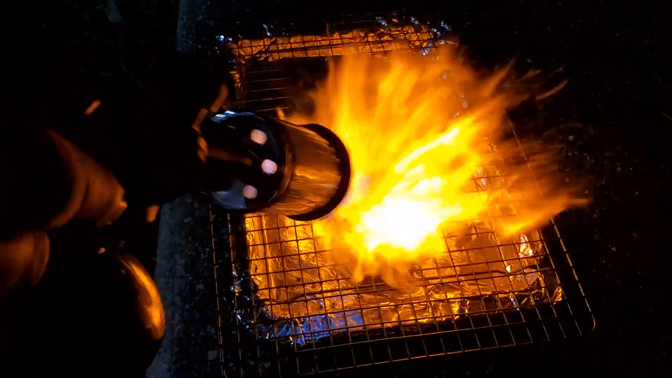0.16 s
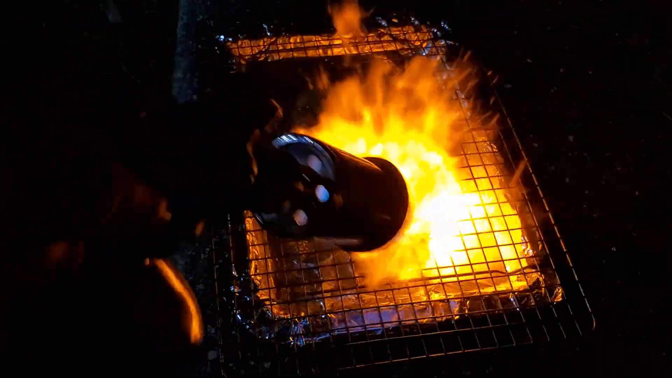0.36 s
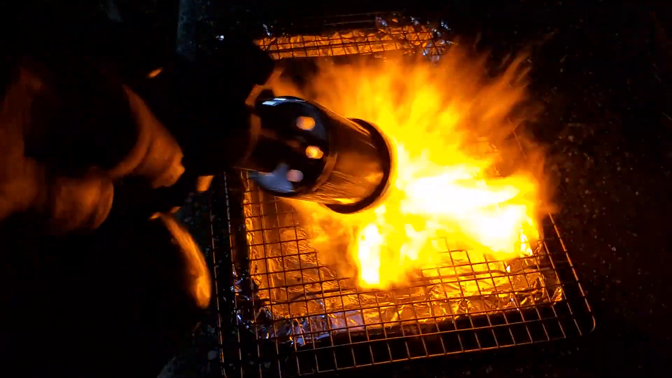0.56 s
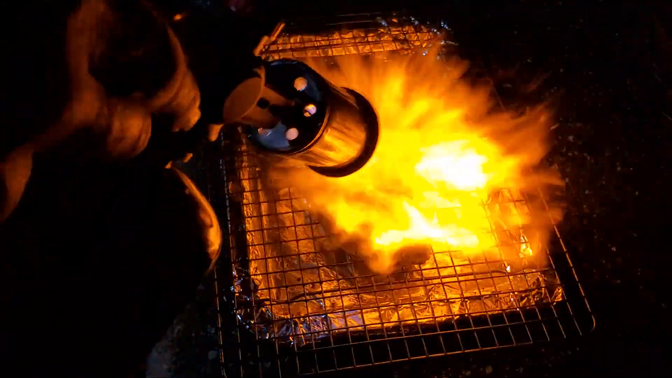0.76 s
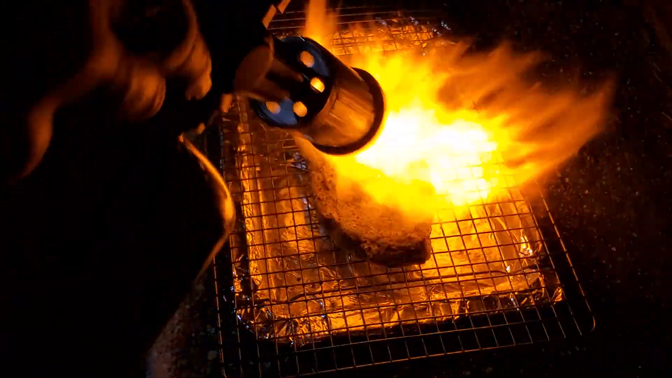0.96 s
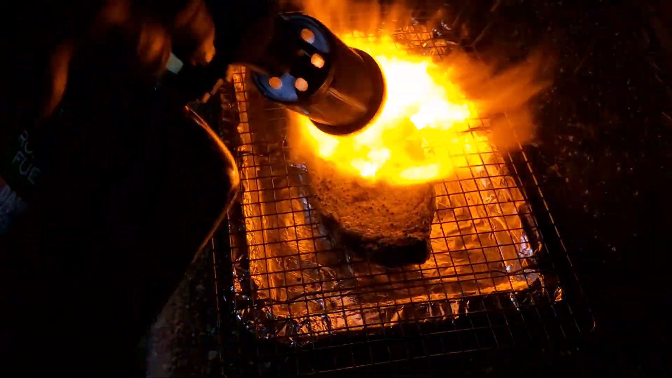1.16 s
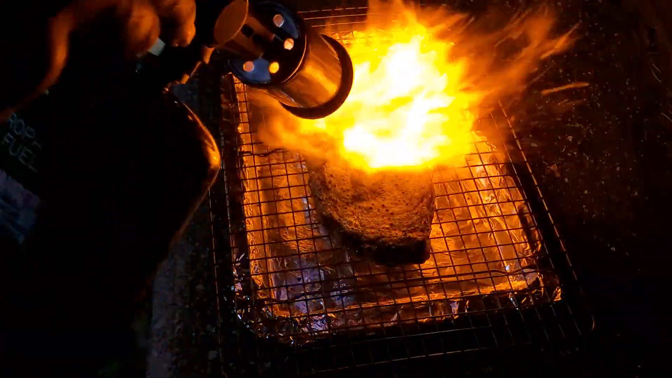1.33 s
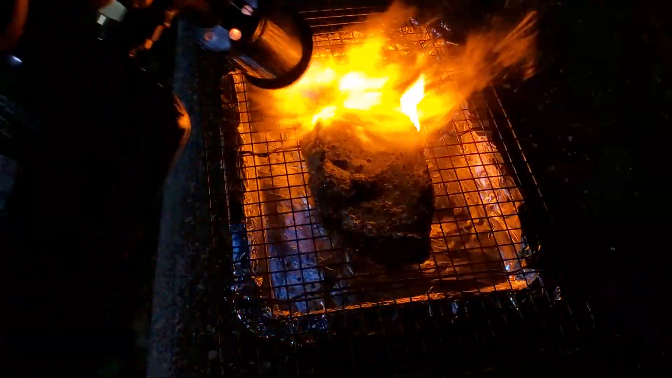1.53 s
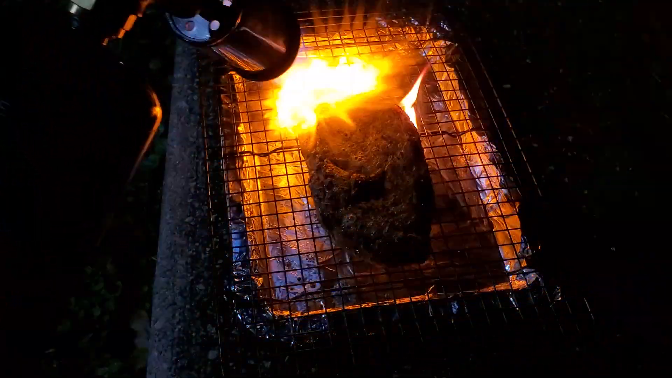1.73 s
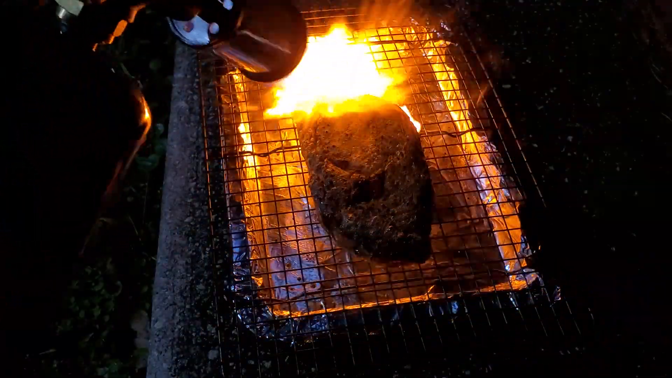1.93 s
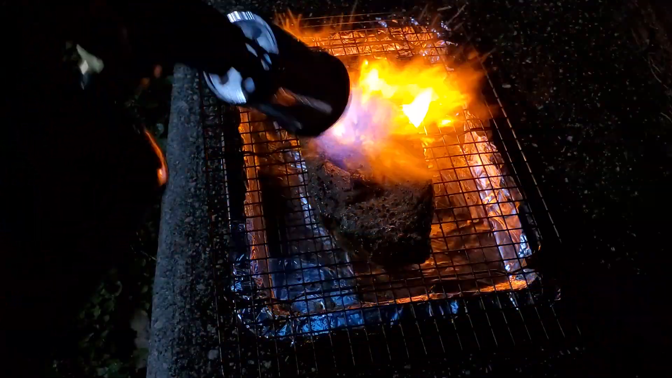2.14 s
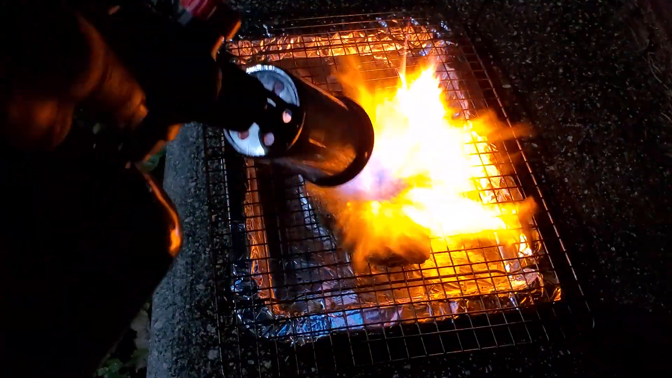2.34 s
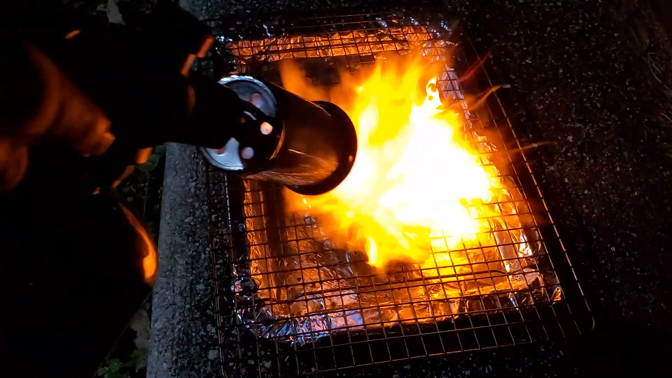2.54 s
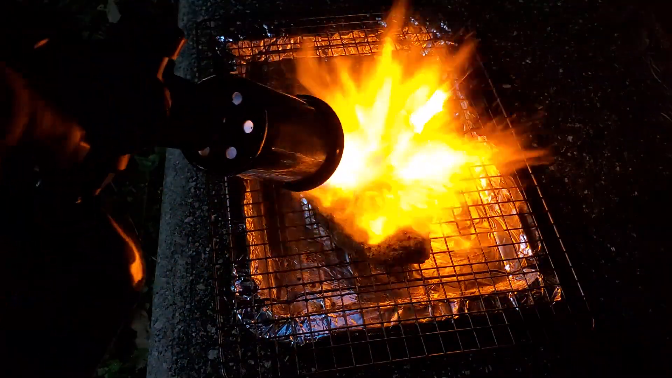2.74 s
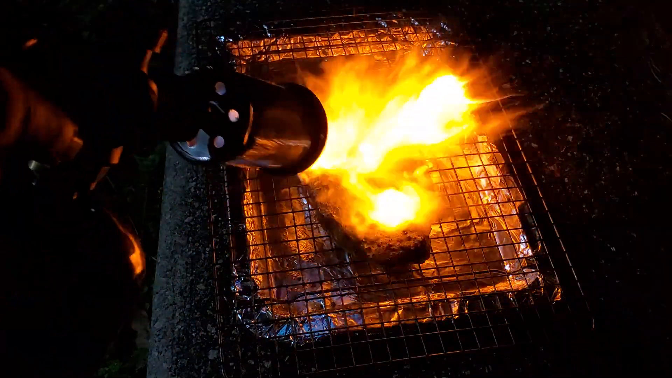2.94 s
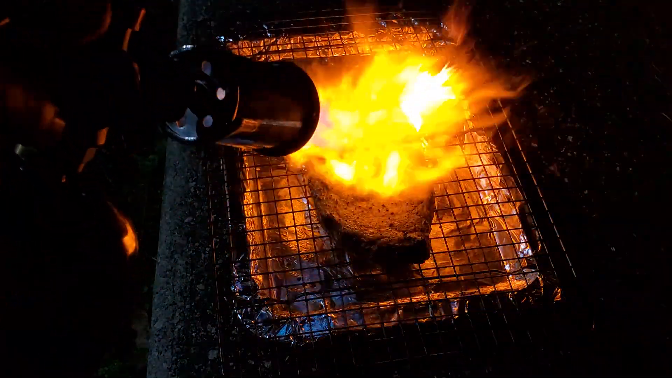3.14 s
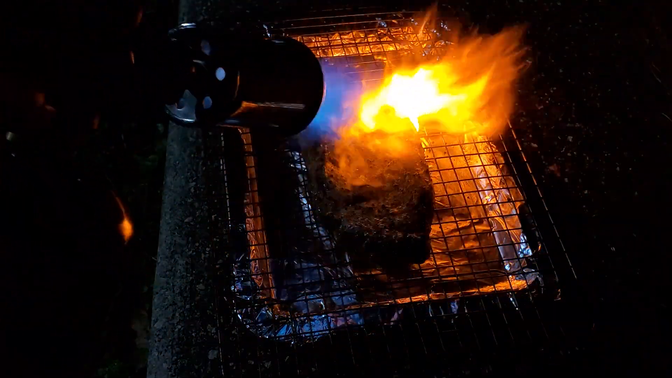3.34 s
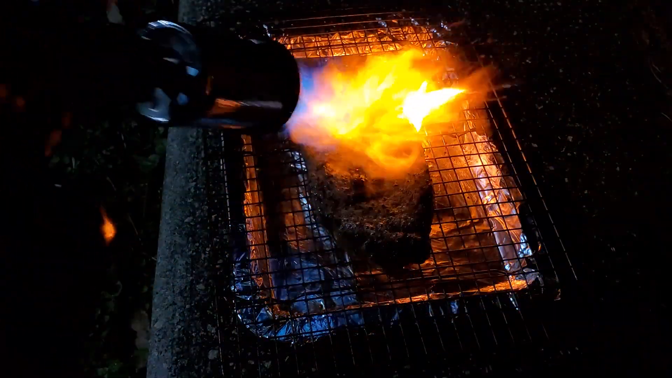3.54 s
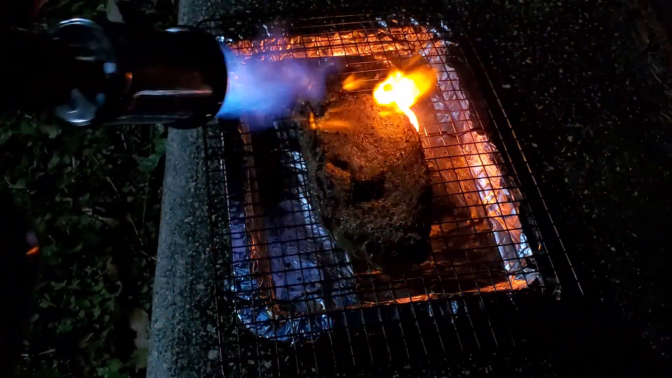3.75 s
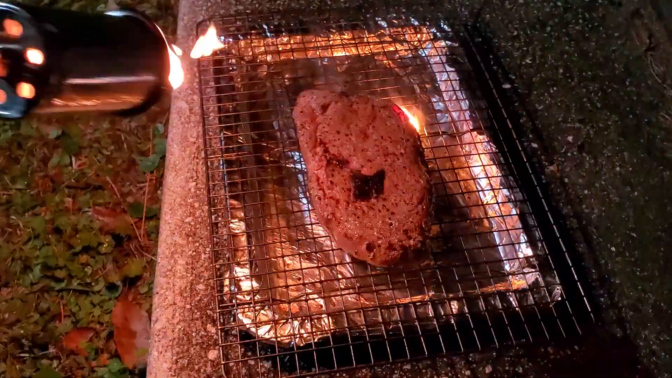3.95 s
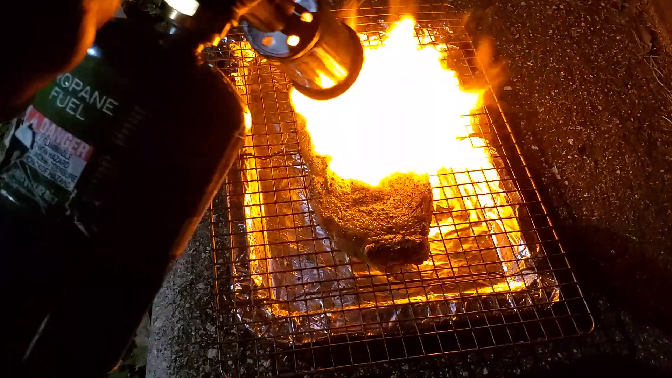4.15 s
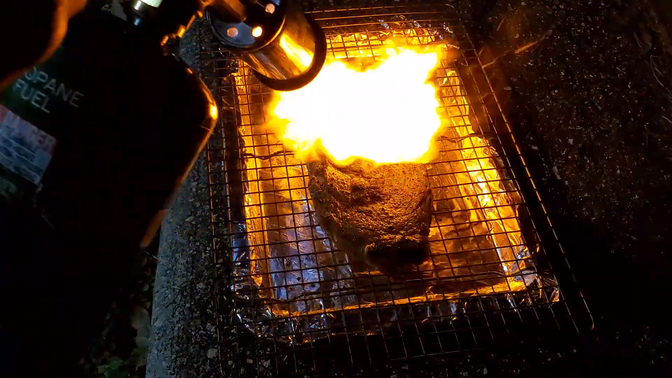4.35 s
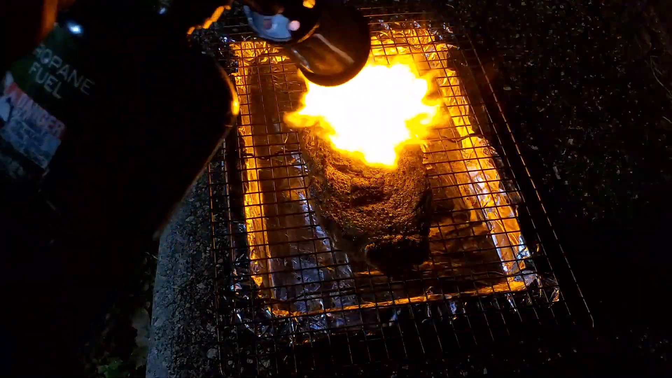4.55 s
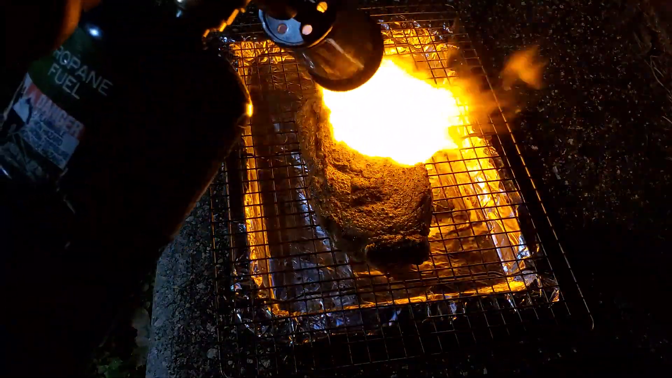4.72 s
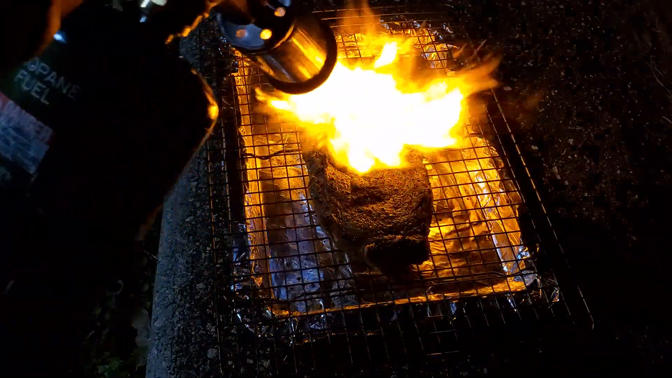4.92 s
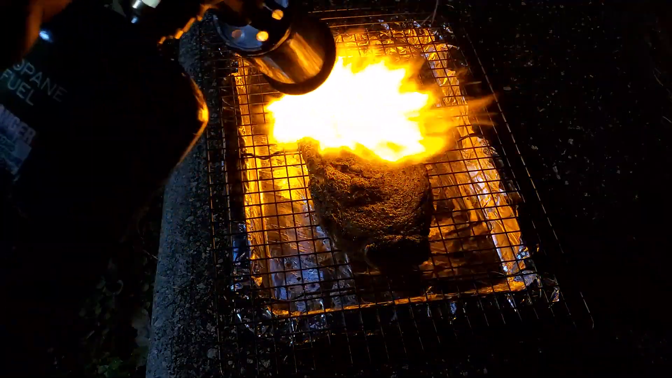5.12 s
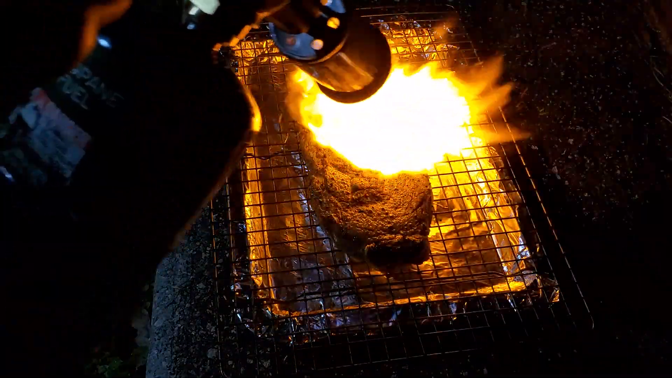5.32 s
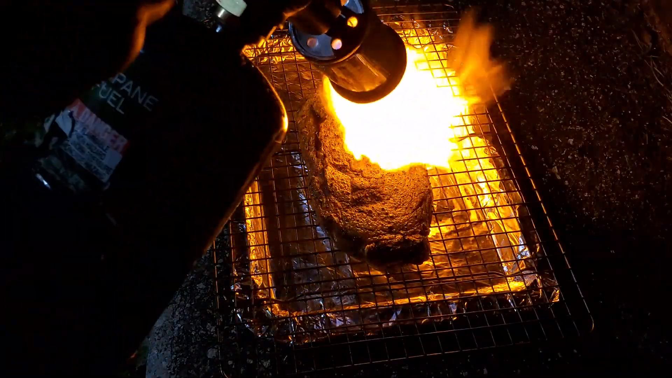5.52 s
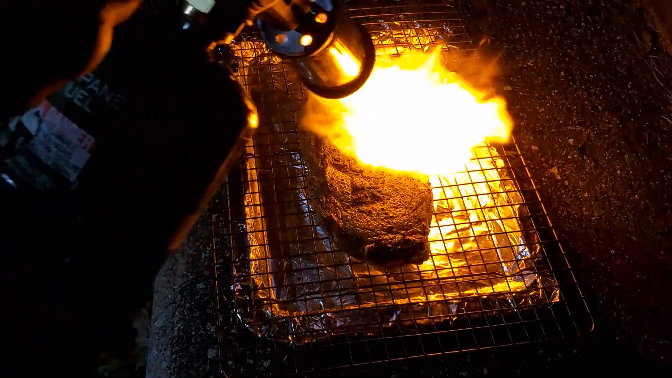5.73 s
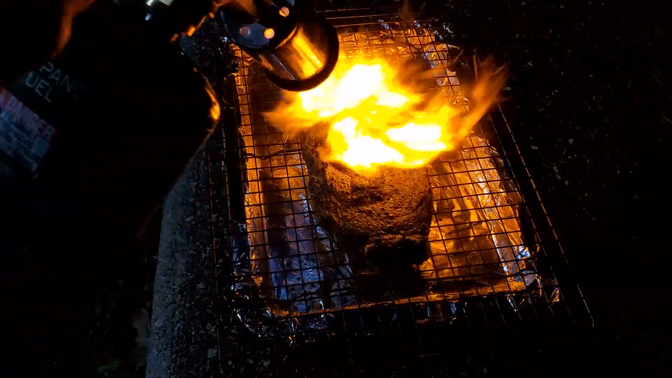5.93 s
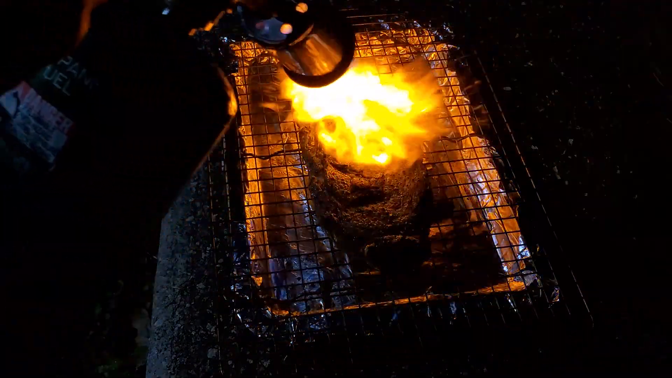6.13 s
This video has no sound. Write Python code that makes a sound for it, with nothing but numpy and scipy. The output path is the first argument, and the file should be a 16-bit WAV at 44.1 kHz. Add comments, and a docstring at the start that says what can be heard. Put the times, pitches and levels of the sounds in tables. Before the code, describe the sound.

Close to the microphone outdoors at night, a handheld gas torch roars loudly, its tone shifting as it sweeps over meat on a grill tray. Fat sizzles faintly and spits. A bright splat bursts midway, the flame fades to a few crackling spits over a low distant machine hum, then a snap and puff relight it and the roar resumes.

```python
"""Outdoors at night, close to a camera: a handheld gas torch sears meat on a grill tray, a machine hums far off.
First the turbulent flame, shaped noise, roars and rings in tube and tray, changing colour as it is aimed.
Fat sizzles throughout as noise and ticks, and spits in short noise puffs; a big spit bursts on the tray.
The torch is drawn back and the flame dies away amid a few more spits.
Then a snap and a push of air light it again, and it roars on from steeply above."""
import sys
import numpy as np
from scipy import signal
from scipy.fft import rfft, irfft, next_fast_len
from scipy.io import wavfile
from scipy.ndimage import uniform_filter1d, map_coordinates

SR = 44100
rng = np.random.default_rng(int(sys.argv[2]) if len(sys.argv) > 2 else 0)


def dump_mix(stems):
    """Bounce the given channels to the path in sys.argv[1] as a 16-bit WAV at rate SR."""
    frames = np.atleast_2d(stems).T  # one column per channel
    limited = np.clip(frames, -1, 1)  # hard clip at full scale
    pcm = np.round(limited * 32767).astype(np.int16)
    wavfile.write(sys.argv[1], SR, pcm)


N = 272538
TIME_S = np.arange(N) / SR
RELIGHT_S = 4.128


def amp(db):
    """Decibels to gain."""
    return 10 ** (np.asarray(db) / 20)


def unit(x):
    """Scale to rms 1."""
    return x / np.sqrt(np.mean(x ** 2) + 1e-20)


def along(points, hz):
    """(frequency [Hz], value) points read on a log frequency axis."""
    f, v = np.transpose(points)
    return np.interp(np.log(hz + 1), np.log(f + 1), v)


def bell(offset, width):
    """A smooth bump of height 1; width is its full width at half height."""
    return 2 ** -((2 * offset / width) ** 2)


def wobble(rate, times=TIME_S):
    """A smooth random curve with rate knots a second, read at the given times."""
    knots = rng.standard_normal(int(N * rate / SR) + 4)
    return map_coordinates(knots, [times * rate])


def filtered(x, response):
    """x times a response of frequency."""
    size = next_fast_len(N + 8192)
    spectrum = rfft(x, size) * response(np.fft.rfftfreq(size, 1 / SR))
    return irfft(spectrum, size)[..., :N]


def coloured(x, spectrum):
    """Give white sound a spectrum and keep its power."""
    return filtered(x, lambda hz: unit(amp(along(spectrum, hz))))


def puff(start_s, t60):
    """Stereo noise that starts at once and falls by 60 dB in t60 seconds."""
    start = int(start_s * SR)
    t = np.arange(SR // 20) / SR
    out = np.zeros((2, N))
    out[:, start:start + len(t)] = amp(-60 * t / t60) * rng.standard_normal((2, len(t)))
    return out


# tones of the far machine: (frequency [Hz], level [dB rms])
MACHINE_TONES = [(60, -53), (120, -51), (180, -59), (240, -75), (360, -68)]
# colour of the low outdoor air: (frequency [Hz], relative density [dB per Hz])
FAR_RUMBLE = [(20, -17), (70, -1), (150, -6), (280, -26), (500, -26), (1200, -36), (4000, -53)]


def night(rumble_db=-52, stray_db=-60):
    """A far machine hums over a low outdoor rumble, part of it unrelated between the microphones."""
    hum = np.zeros(N)
    for hz, db in MACHINE_TONES:
        cycles = hz * TIME_S + rng.random()
        hum += amp(db) * np.sqrt(2) * np.sin(2 * np.pi * cycles + .3 * wobble(2.6))
    shared_air = amp(rumble_db) * rng.standard_normal(N)
    stray_air = amp(stray_db) * rng.standard_normal((2, N))
    return hum + coloured(shared_air + stray_air, FAR_RUMBLE)


# colour of frying fat, also used for the snaps of the spits: (frequency [Hz], relative density [dB per Hz])
FAT = [(300, -28), (1000, -20), (1800, -0.5), (4200, -6.5), (7500, 0.5), (9600, -9), (12500, 1.5),
       (15500, -5)]


def sizzle(fry_db=-49, crackle_db=-55, spread_db=6.0, count=700):
    """Countless tiny bubbles of fat fry; some burst loudly enough to be heard as single ticks."""
    when, size, side = rng.random((count, 3)).T
    # mostly weak ticks and a few strong ones
    strength = amp(spread_db * np.minimum(-np.log(1 - size), 4))
    at = (when * N).astype(int)
    ticks = [np.bincount(at, strength * np.sqrt(part), N) for part in (side, 1 - side)]
    crackle = amp(crackle_db) * unit(np.array(ticks))
    frying = amp(fry_db) * rng.standard_normal((2, N))
    return coloured(crackle + frying, FAT)


# small spits of fat: (time [s], level [dB], to which snap_db or body_db is added)
SPITS = [(1.163, -18), (1.549, -18), (3.8477, -31), (3.8574, -26), (3.895, -25), (3.9973, -31),
         (4.0741, -31), (4.0865, -24)]
# the big spit that bursts on the tray: (time [s], level [dB], t60 [s])
BURST = (3.3108, -13, .017)
# colour of a splat on the tray: (frequency [Hz], relative density [dB per Hz])
SPLAT = [(500, -25), (2200, -9), (3300, 0), (5200, -7), (7200, -2), (9600, -12), (14500, -5)]


def spits(snap_hz=6500, snap_db=2.5, body_db=-13):
    """Drops of fat burst with a thin bright snap over a little body; the big one splats on the tray."""
    snaps = sum(amp(db + snap_db) * puff(s, t60=.007) for s, db in SPITS)
    bodies = sum(amp(db + body_db) * puff(s, t60=.008) for s, db in SPITS)
    # a high-pass thins the snaps
    thin = filtered(coloured(snaps, FAT), lambda hz: hz ** 2 / np.hypot(hz ** 2, snap_hz ** 2))
    burst_s, burst_db, burst_t60 = BURST
    splat = amp(burst_db) * puff(burst_s, burst_t60)
    return thin + coloured(bodies + splat, SPLAT)


def dip(depth_db=11, fall_s=0.0011, recover_s=0.023):
    """Gain for a level that dips briefly at the big spit."""
    t = TIME_S - BURST[0]
    return amp(-depth_db * np.exp(-(t / np.where(t < 0, fall_s, recover_s)) ** 2))


def ignition(push_db=-14, spark_db=-25, push_s=.0003):
    """The spark ticks and the gas catches with one short push of air."""
    u = np.maximum(TIME_S - RELIGHT_S, 0) / push_s
    push = (u > 0) * (u - 1) * np.exp(-u)
    return amp(push_db) * push + amp(spark_db) * puff(RELIGHT_S, t60=.004)


def resonances(modes, hz, frames, drift=0.018, waver=0.31, flicker_rate=28):
    """Lift in dB, frequency by time; each mode drifts in pitch, and the higher ones flicker more in strength."""
    lift_db = 0
    for centre, width, db in modes:
        strength = 1 + waver * np.sqrt(centre / 5000) * wobble(flicker_rate, frames)
        drifting_hz = centre * (1 + drift * wobble(7, frames))
        lift_db = lift_db + db * strength * bell(hz[:, None] - drifting_hz, width)
    return lift_db


# the jet sweeps over the meat and one resonance swells, or sinks if negative:
# (time [s], length [s], frequency [Hz], peak lift [dB])
SWELLS = [(.35, .2, 3550, 7), (.85, 0.18, 3240, 6.5), (1.13, 0.47, 2840, 8.5), (1.617, 0.54, 1610, 4),
          (1.8, 0.36, 3200, -11), (2.35, 0.33, 2700, 7), (2.75, .55, 1590, -8), (2.85, 0.61, 3600, 6.5),
          (4.3, .2, 3400, 5), (5, 0.2, 3400, 3.5), (5.6, .6, 2940, 6.5)]


def sweep(hz, frames, width_hz=310):
    """Lift in dB as the jet moves over the meat and resonances swell in turn."""
    return sum(db * np.outer(bell(hz - centre, width_hz), bell(frames - s, length))
               for s, length, centre, db in SWELLS)


def tray_echo(hz, frames, pose, delay_s=0.001295, per_pose_s=0.00031, shake_s=.00004, ripple_db=0.56):
    """The tray's echo cuts a comb into the hiss, which slides as the hand moves."""
    shake = np.interp(frames, TIME_S, wobble(2.81))
    delay = delay_s + per_pose_s * pose + shake_s * shake
    treble = np.clip((hz - 1500) / 1000, 0, 1)[:, None]
    return ripple_db * treble * np.cos(2 * np.pi * np.outer(hz, delay))


# likeness of the two microphones, whatever the pose: (frequency [Hz], correlation [0-1])
ALIKE = [(230, 1), (390, 0.83), (520, 0.85), (700, 0.56), (1200, 0.79), (1850, 0.5), (3400, 0.4),
         (7500, 0.14), (14000, .18)]


def microphones(rows, hz):
    """Mixing angle, balance and phase between left and right; the bass reaches both alike."""
    f, *cols = np.transpose(rows)
    lead, tilt_db = [np.interp(hz, f, c) for c in cols]
    # left and right mix two noises at plus and minus this angle
    turn = np.arccos(np.clip(along(ALIKE, hz), 0, .999)) / 2
    return np.array([turn, amp(tilt_db)]), np.exp(-1j * lead)


# where the torch points: (time [s], pose [0 drawn back, 1 from the side, 2 steeply from above])
# the colour holds its end pose beyond 0 and 2; the loudness in flame() follows further
AIM = [(0, 0.8), (.9, 1.16), (1.4, 1.43), (1.85, 2.16), (2.3, 1.23), (3.0, 1.13), (3.35, -0.1), (3.9, -0.5),
       (4.12, 2), (5.1, 2), (5.5, 1.75), (6.18, 2)]
# broad colour of the turbulence, and of the gas jet from its first frequency up:
# (frequency [Hz], relative density [dB per Hz])
TURBULENCE = [(20, -41), (46, -27), (70, 7), (100, -1), (160, -.5), (240, 0.5), (430, -11), (900, -5.5),
              (1550, -11), (1980, -21.5), (3300, -27), (4600, -33.5), (7700, -30.5)]
JET = [(7700, -32.5), (9800, -41), (11200, -37.5), (15500, -33.5)]
# resonances of tube and tray in each pose, negative where the tray's echo cancels:
# (frequency [Hz], width [Hz], lift before flicker [dB])
BACK_MODES = [(504, 88, 7), (786, 130, -1), (1140, 340, 4.5), (1570, 180, 5.5), (2240, 190, 6),
              (2650, 300, 2.5), (3340, 400, 13), (4120, 200, 9.5), (5500, 400, 7), (7400, 300, 5.5),
              (10700, 500, 6)]
SIDE_MODES = [(542, 125, 10.6), (710, 110, 3.7), (1217, 450, 8.7), (1563, 190, 6.8), (2460, 610, 3.7),
              (3560, 210, 8.1), (5510, 340, 6.8), (7340, 200, 10), (10660, 370, 4)]
ABOVE_MODES = [(527.4, 69, 7.5), (743, 223, 6.5), (870, 132, -17.5), (1370, 490, 9), (1743, 90, 7.5),
               (2210, 390, -1), (2555, 270, 7), (3260, 1300, 6.5), (5630, 380, 8.5), (7600, 340, 8),
               (10900, 600, 4.5)]
# between the microphones, in each pose: (frequency [Hz], lead of left [rad], left over right [dB])
BACK_STEREO = [(230, 0, 0), (390, 1.7, 2.9), (520, .6, .3), (640, .6, 4.3), (790, 2.8, 6.8),
               (1000, .3, -1.8), (1550, 2, 6.6), (1850, .2, -2.3), (2300, 1.5, 1.8), (3400, 1.7, -1),
               (5600, .8, 3.5), (7500, 3.4, 4.1)]
SIDE_STEREO = [(230, 0, 0), (390, 1.3, -.9), (520, .6, .4), (640, .3, 7.8), (790, 3.3, .2), (1000, 6.1, .3),
               (1270, 7.3, -1), (1550, 5.3, -.1), (1850, 8.4, -.6), (2300, 7.6, 4.8), (3400, 7.3, -1.4),
               (5600, 5.7, 2.3), (14000, 9.3, 2.7)]
ABOVE_STEREO = [(230, 0, 0), (390, 1, -3.4), (520, .7, 2.8), (640, 2.4, 4.6), (790, 4.3, -3.1),
                (1000, 5.7, 4.5), (1270, 6.4, -1.5), (1550, 6.5, 2.3), (1850, 6.7, .7), (2300, 7.4, 3.9),
                (3400, 7.6, -3.2), (5600, 4.7, 3.7), (7500, 6.4, 1.8), (14000, 4, 3.5)]


def eddies(size=1024):
    """Short-time spectra of the flame at both microphones, coloured by the pose of the torch."""
    hz, t, (a, b) = signal.stft(rng.standard_normal((2, N)), SR, nperseg=size)
    pose = np.clip(np.interp(t, *np.transpose(AIM)), 0, 2)
    # how much of each of the three poses is heard at each time
    share = np.maximum(1 - abs(pose - np.arange(3)[:, None]), 0)

    def blend(per_pose):
        return np.moveaxis(np.array(per_pose), 0, -1) @ share

    pose_modes = (BACK_MODES, SIDE_MODES, ABOVE_MODES)
    lift_db = sum(part * resonances(modes, hz, t) for part, modes in zip(share, pose_modes))
    # the flame licks about, so the colour shifts in patches
    patches = uniform_filter1d(rng.standard_normal(a.shape), size=9, axis=0)
    patches = unit(uniform_filter1d(patches, size=12, axis=1))
    patchy_db = along([(200, 0.82), (1200, 1.2), (3000, 1.58)], hz)[:, None]
    slope_db = np.where(hz < JET[0][0], along(TURBULENCE, hz), along(JET, hz))
    moving_db = lift_db + sweep(hz, t) + tray_echo(hz, t, pose) + patchy_db * patches
    gain = amp(slope_db[:, None] + moving_db)

    pose_stereo = (BACK_STEREO, SIDE_STEREO, ABOVE_STEREO)
    weights, delays = zip(*[microphones(rows, hz) for rows in pose_stereo])
    turn, tilt = blend(weights)
    left = (np.cos(turn) * a + np.sin(turn) * b) * tilt
    right = (np.cos(turn) * a - np.sin(turn) * b) * np.exp(1j * np.angle(blend(delays)))
    return hz, gain, np.array([left, right]) / np.hypot(tilt, 1)


# parts of the flame, from low to high (roar, burner, rush, jet): (level [dB], pose effect [dB per step],
# flare effect [dB per strength], loss after FADE_S [dB], bend of the fade [exponent])
VOICES = [(-18.5, -0.2, 2.0, 23, 1.24), (-16, -0.1, 0.34, 30.5, 1.37), (-28, -1.21, 1.8, 24, 0.82),
          (-0.95, 0.5, 1.2, 25, 1.3)]
# level of the jet's treble, added to the jet's row above: (time [s], level [dB])
HISS = [(0, -35), (0.95, -35.5), (1.1, -34.2), (1.75, -33.5), (2.1, -37.5), (3.7, -35.5), (4.3, -35.5),
        (4.7, -38.5), (6.18, -37.5)]
# fat catches fire and the flame flares: (time [s], strength [1])
FLARES = [(.36, 0.93), (.73, .9), (1.12, 1.3), (1.38, 1.2), (2.33, 0.62), (2.83, 0.59), (4.3, 0.3),
          (5.05, 0.77), (5.8, 0.63)]
# the flame sags for a moment: (time [s], length [s], level [dB])
LULL = (0.86, 0.24, -1.7)
FLARE_S = 0.23  # full width at half height
SHUT_S, FADE_S = 3.725, .2  # the gas is turned down and the flame fades ever further until it is relit


def flame(slow_db=0.18, fast_db=0.66, own_db=0.36):
    """Big eddies roar, the burner rings, small eddies rush, the jet hisses; they flutter partly together."""
    hz, gain, pair = eddies()
    edges_hz = [0, 400, 2000, 9000, SR]
    pose = np.interp(TIME_S, *np.transpose(AIM))
    flare = sum(strength * bell(TIME_S - s, FLARE_S) for s, strength in FLARES)
    lull_s, lull_length, lull_db = LULL
    flutter_db = slow_db * wobble(7.1) + fast_db * wobble(90)
    shared_db = lull_db * bell(TIME_S - lull_s, lull_length) + flutter_db
    # once the valve closes the last gas burns off; the relit flame is there at once
    closing = np.maximum(TIME_S - SHUT_S, 0) / FADE_S * (TIME_S < RELIGHT_S)
    bases_db = [0, 0, 0, np.interp(TIME_S, *np.transpose(HISS))]
    out = np.zeros((2, N))
    for lo, hi, base_db, voice in zip(edges_hz, edges_hz[1:], bases_db, VOICES):
        db, pose_db, flare_db, fade_db, bend = voice
        band = gain * ((hz >= lo) & (hz < hi))[:, None]
        # colour may change from frame to frame, while the level is set below
        steady = band / np.linalg.norm(band, axis=0)
        sound = signal.istft(pair * steady)[1][:, :N]
        level_db = base_db + db + pose_db * pose + flare_db * flare - fade_db * closing ** bend
        out += unit(sound) * amp(level_db + shared_db + own_db * wobble(25))
    return out


def scene():
    """Torch and meat close to the microphones, in the open air, with the machine far off."""
    return night() + sizzle() + spits() + ignition() + flame() * dip()


def record(dry, top_hz=16050):
    """The camera rounds off the highest peaks and keeps nothing above its band limit."""
    rounded = dry / (1 + abs(dry) ** 8) ** (1 / 8)
    return filtered(rounded, lambda hz: hz < top_hz)


dry = scene()
out = record(dry)
dump_mix(out)
```